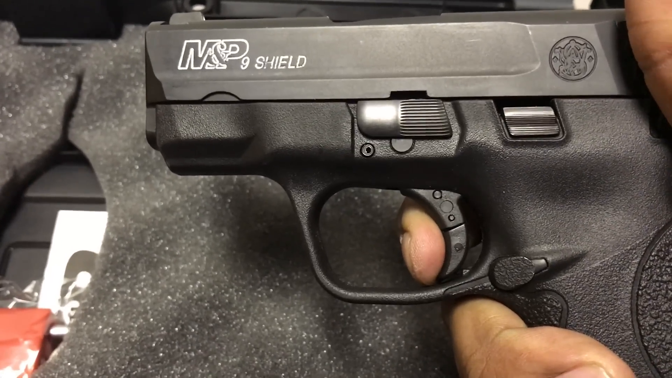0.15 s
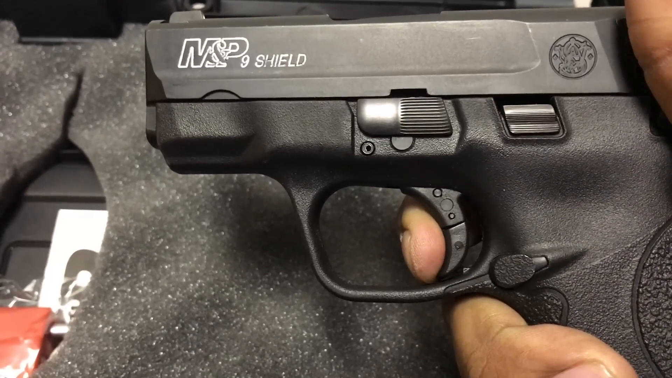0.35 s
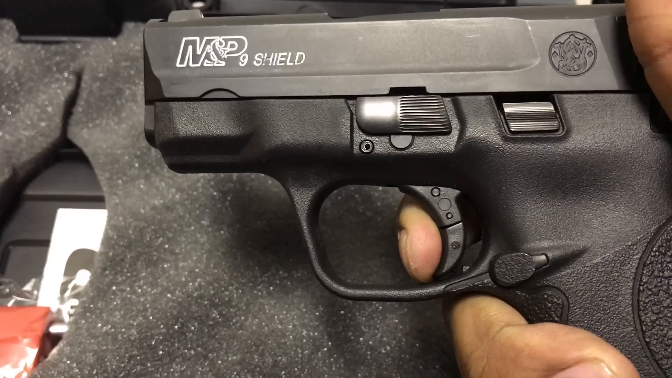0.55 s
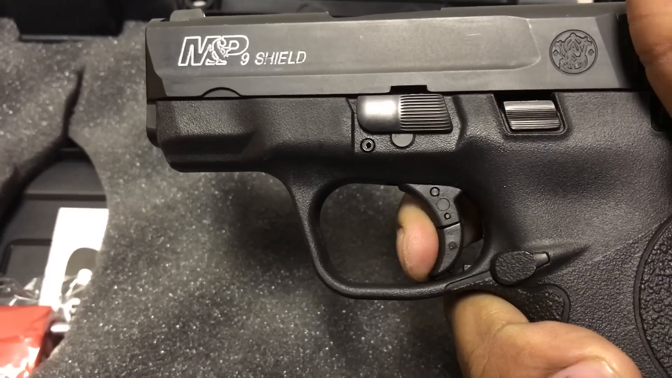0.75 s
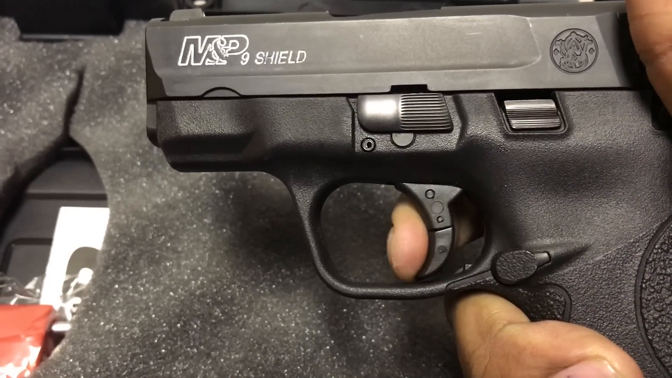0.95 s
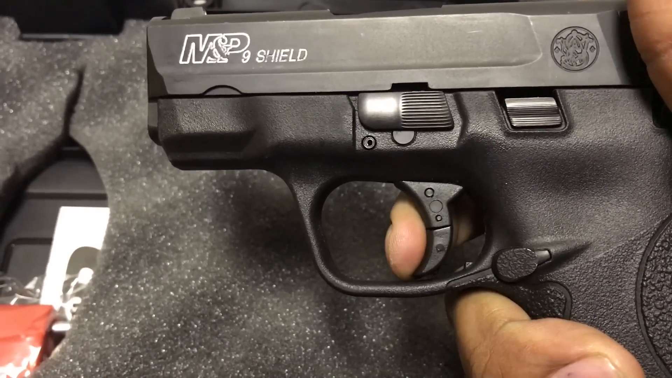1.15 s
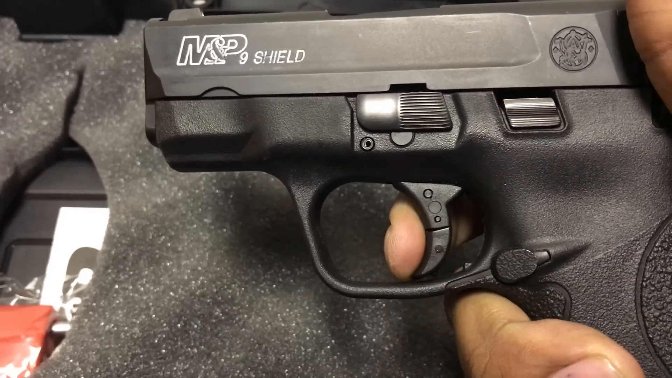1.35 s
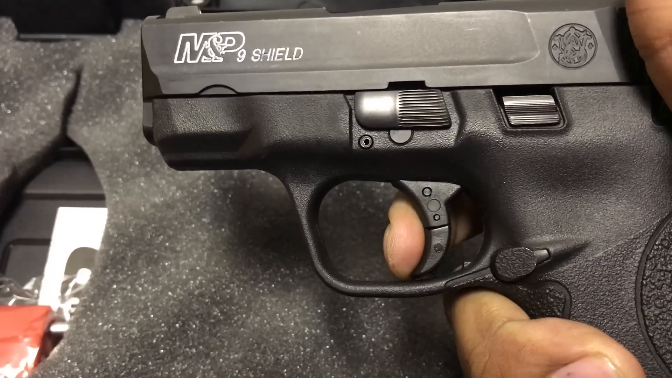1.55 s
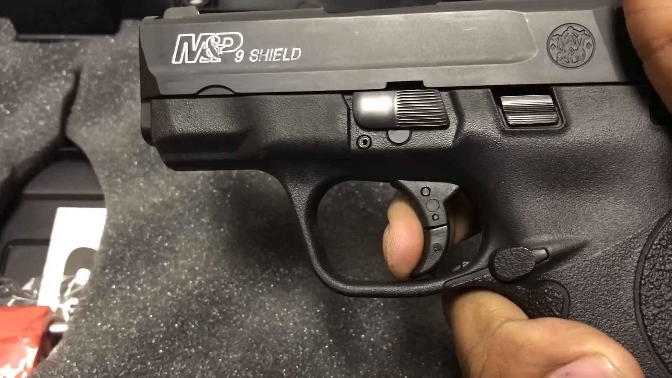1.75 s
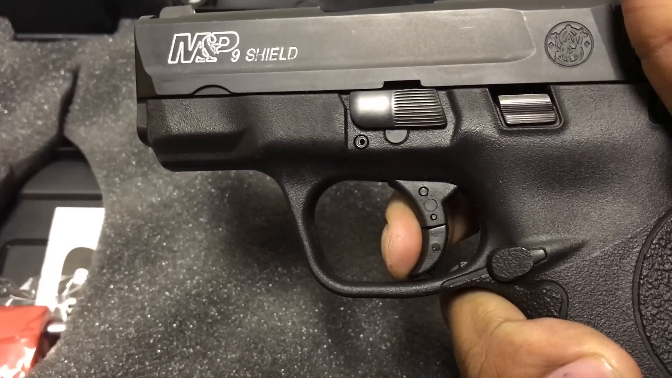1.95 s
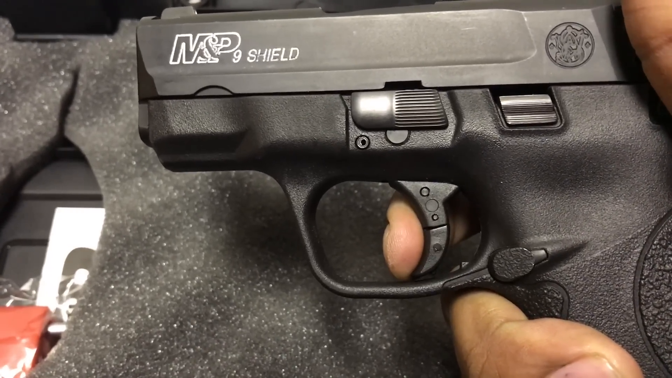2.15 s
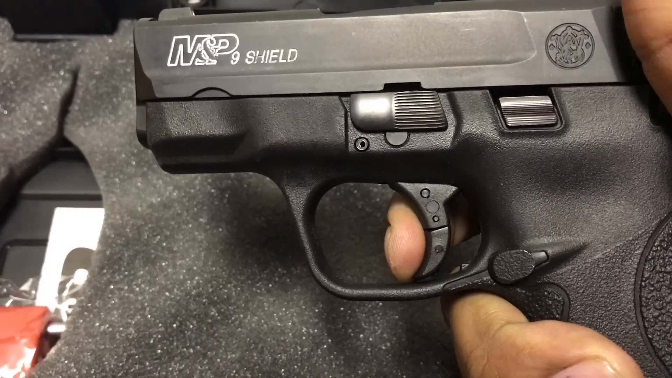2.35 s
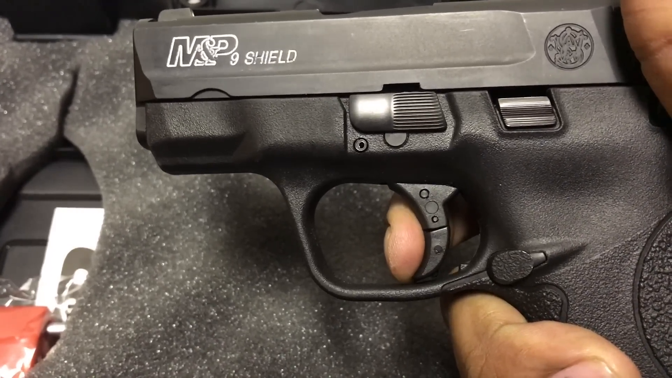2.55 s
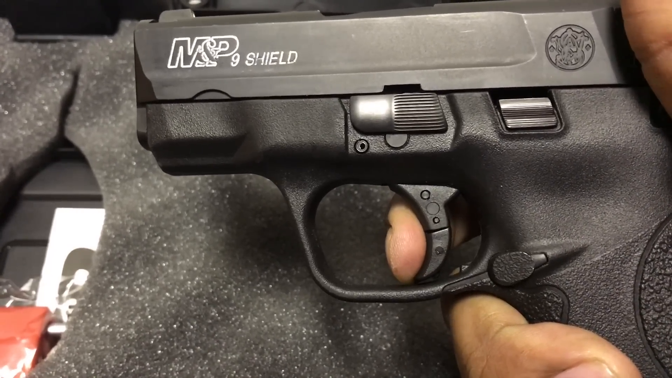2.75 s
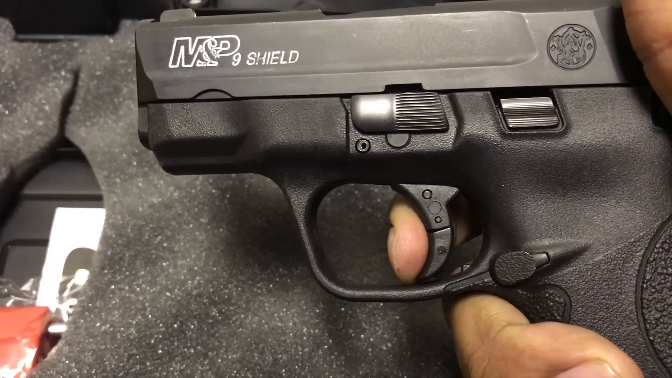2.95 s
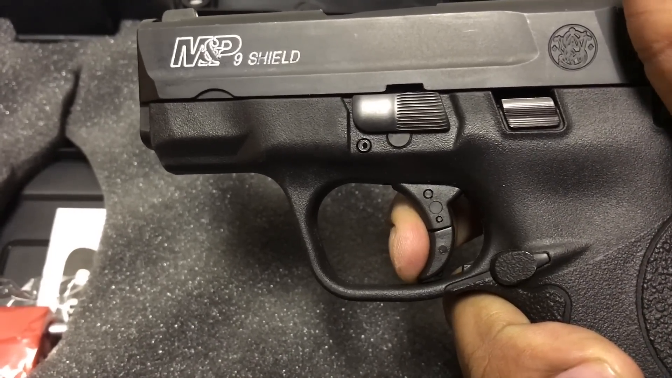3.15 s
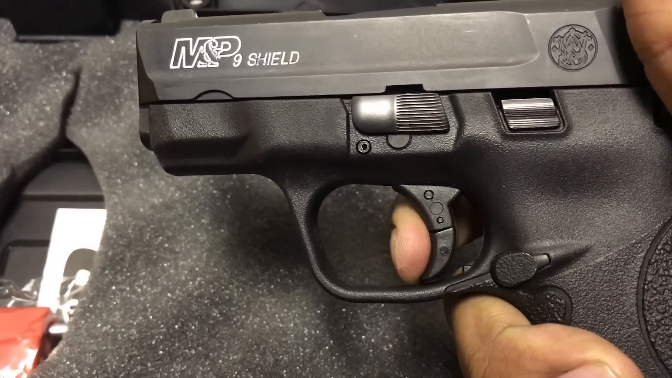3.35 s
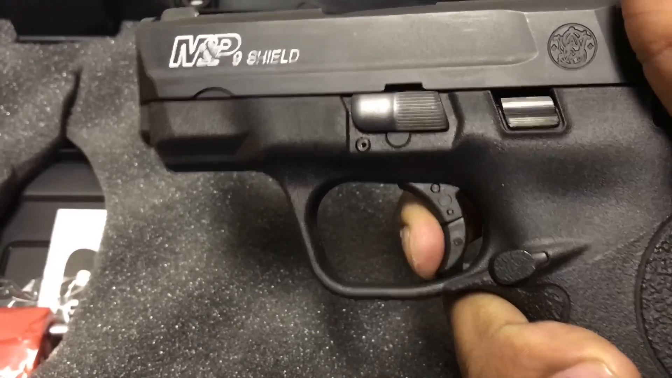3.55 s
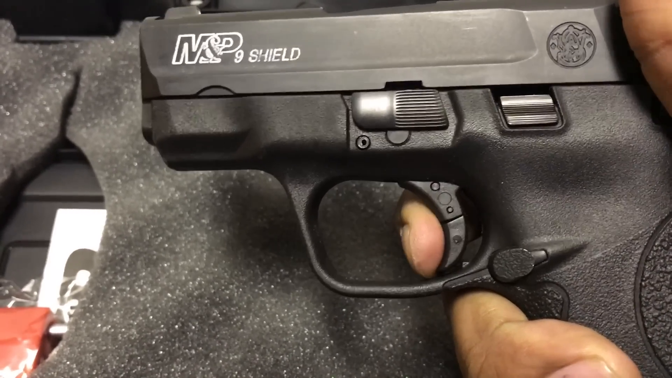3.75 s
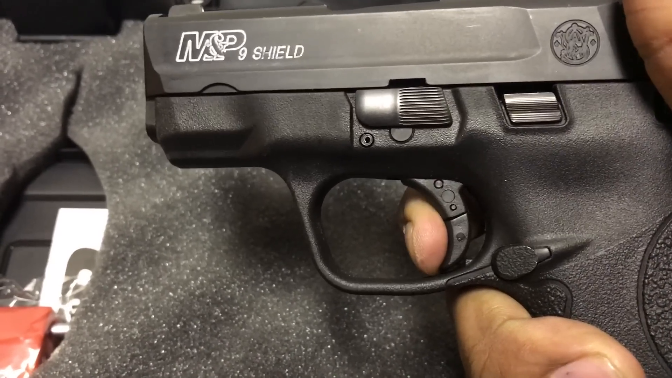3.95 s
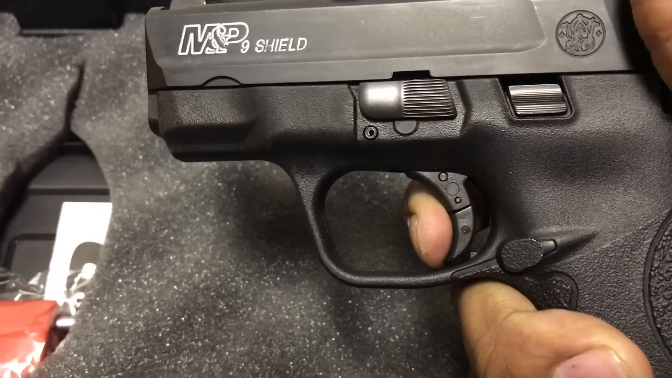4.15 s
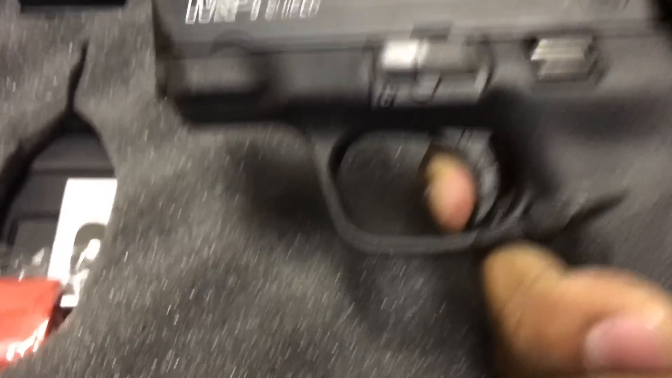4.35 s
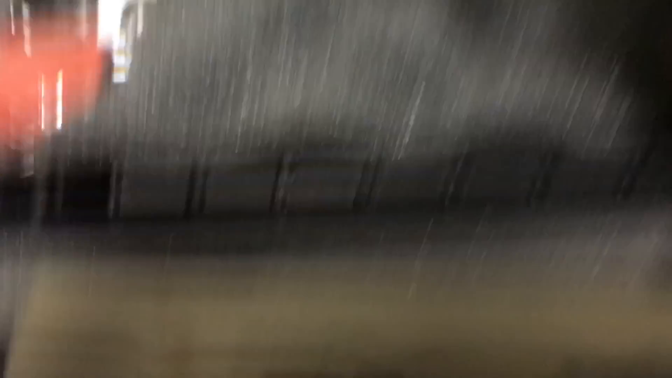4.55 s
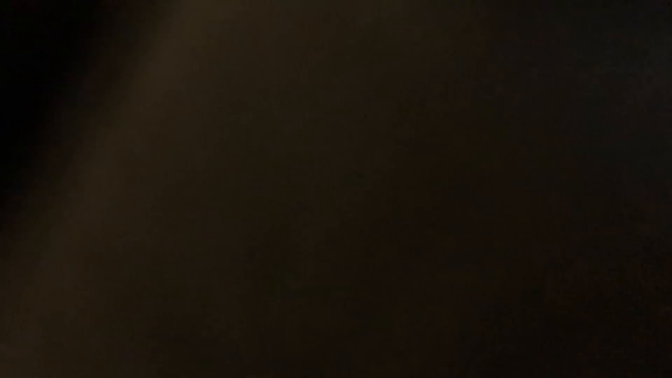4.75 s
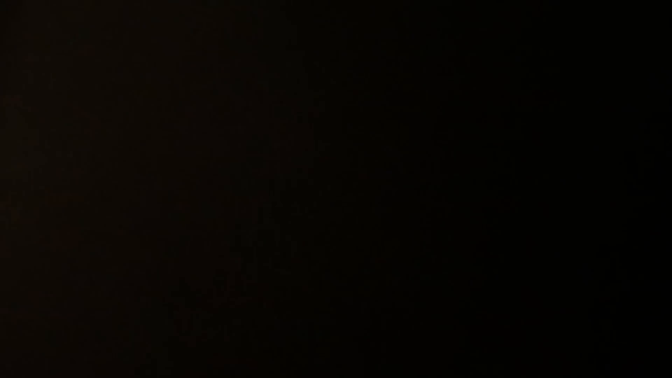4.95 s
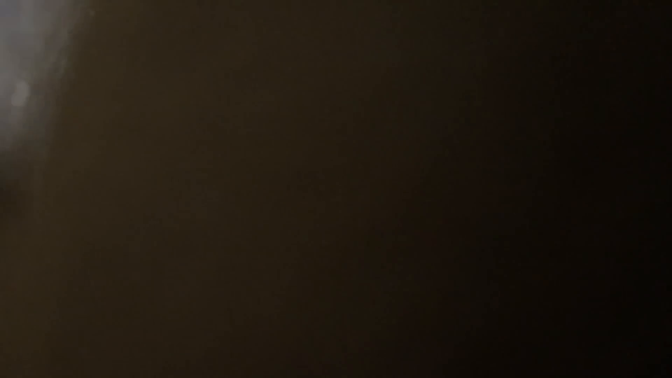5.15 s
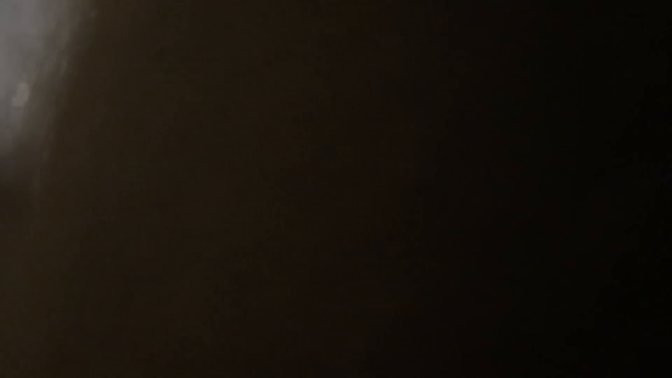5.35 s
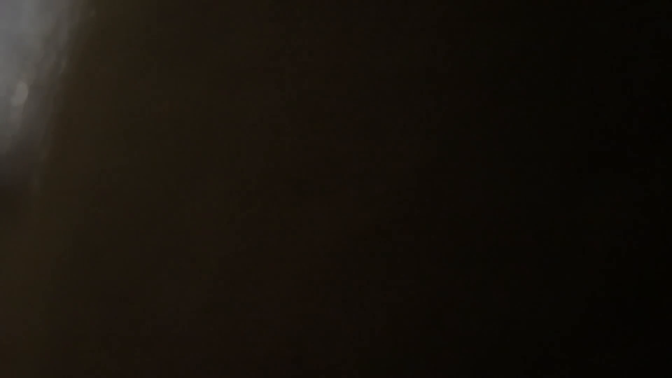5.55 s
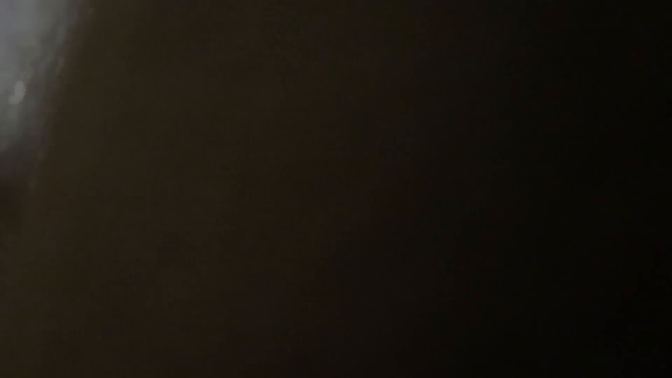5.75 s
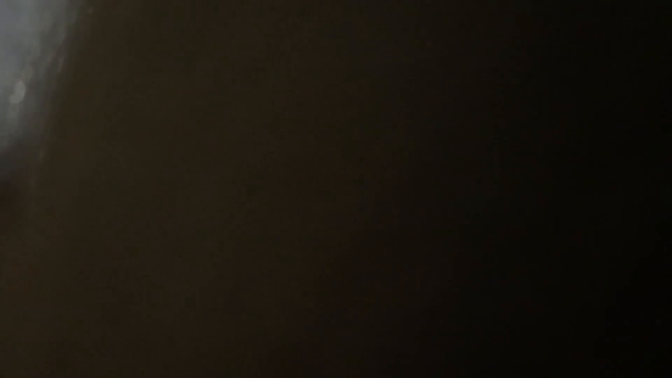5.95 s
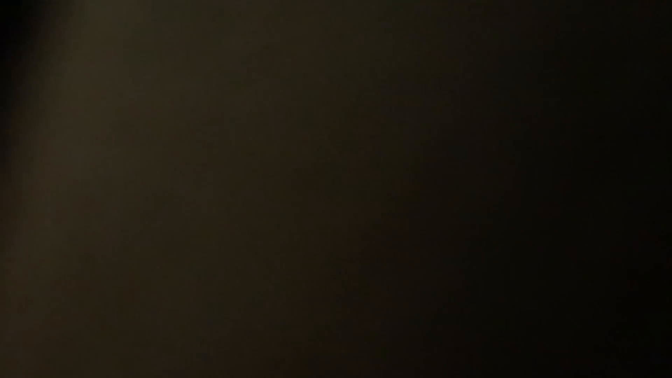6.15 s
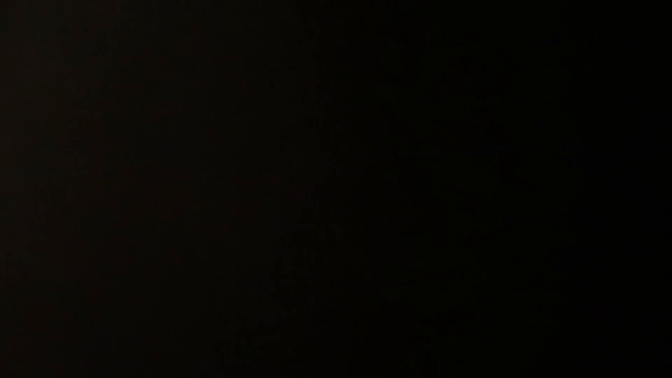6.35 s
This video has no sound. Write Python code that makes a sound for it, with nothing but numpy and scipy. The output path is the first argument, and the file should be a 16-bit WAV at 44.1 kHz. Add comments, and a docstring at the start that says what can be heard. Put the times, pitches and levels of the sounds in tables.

```python
"""A small room, a pistol dry-fired close to a phone. The trigger creeps, breaks with a click as sear and
striker knock the frame, and later snaps forward on its spring. The phone is set down with bumps and
rubbing; the steel slide is racked, scraping its rails and hitting its stops; the phone is touched again.
Mains hum and hiss lie below. The phone limits the peaks and gates its treble between loud sounds."""
import sys
import numpy as np
from scipy import signal
from scipy.fft import rfft, irfft, next_fast_len
from scipy.io import wavfile
from scipy.ndimage import uniform_filter1d, minimum_filter1d, map_coordinates

SR = 44100
rng = np.random.default_rng(int(sys.argv[2]) if len(sys.argv) > 2 else 0)


def inscribe(sig):
    """Save sig as 16-bit PCM at rate SR to the path in sys.argv[1].

    A 1-D sig is mono; a 2-D sig holds one channel per row.
    Samples are clipped to [-1, 1] before scaling.
    """
    pcm = np.round(np.clip(np.atleast_2d(sig).T, -1, 1) * 32767)
    wavfile.write(sys.argv[1], SR, pcm.astype(np.int16))


N = 281996
TIME_S = np.arange(N) / SR
AGE_S = np.arange(SR // 3) / SR  # since a contact

# mains hum: f/Hz, level/dB
HUM_TONES = [(120, -58.8), (240, -73.5)]
# hiss: f/Hz, density/dB
HISS_SPECTRUM = [(15, -37), (28, -13), (50, -4.5), (90, -11), (170, -14), (300, -17.5), (450, -21.5),
                 (840, -22.5), (2000, -27), (6000, -29.5), (13000, -29), (16000, -27)]
# background dips: t/s, level/dB
DIPS = [(3.665, -13.5), (5.15, -6)]
# room decay: f/Hz, t60/s
ROOM_DECAY = [(200, 0.17), (1500, 0.24), (4000, 0.25), (9000, 0.13), (15000, 0.1)]

# bumps on the phone's case: t/s, thud level/dB, tick level/dB, tick cutoff/Hz
BUMPS = [(4.8138, -18.5, -12, 14000), (4.837, 13.5, 7.5, 14300), (4.8442, 9.5, -2.5, 14000),
         (4.8861, 7.5, -2.5, 5460), (5.0522, -26, -11, 7000), (5.082, -9.5, -19, 6000),
         (5.108, 14.5, 9.5, 6000), (5.1106, 14, 19.5, 6000), (5.135, 0.5, -24, 6000),
         (6.347, -24, -22, 7000), (6.372, -9.5, -25, 5100)]
# thud of the case: f/Hz, density/dB
THUD_SPECTRUM = [(18, -21), (30, -22), (65, -3), (177, -4.5), (244, -1.5), (320, -4), (405, 1), (480, -8.5),
                 (570, 0.5), (730, -13.5), (1000, -13), (1700, -18), (2100, -35), (4300, -30), (8000, -45)]
# tick of the case: f/Hz, density/dB
TICK_SPECTRUM = [(500, -3), (1500, -5.5), (3000, -3.5), (6300, -0.5), (8500, -2), (11000, -7),
                 (16000, -3.5)]
# hand and cloth strokes on the case: t/s, length/s, scuff level/dB, cloth level/dB
STROKES = [(4.835, 0.071, -36.5, -65), (4.937, 0.052, -26, -50), (5.027, 0.088, -40, -53),
           (5.113, 0.028, -22.5, -67), (5.186, 0.039, -58, -76.5), (5.455, 0.025, -57.5, -71.5),
           (5.59, 0.19, -56, -54), (6.356, .04, -47.5, -52.5)]
# low scuff: f/Hz, density/dB
SCUFF_SPECTRUM = [(25, -39.5), (80, -21), (160, -8), (243, 1.5), (329, -11), (400, -4), (500, -9),
                  (680, -15), (1020, -18.5), (2150, -39), (4600, -41.5), (16000, -67)]
# cloth hiss: f/Hz, density/dB
CLOTH_SPECTRUM = [(60, -6.5), (200, -0.5), (450, -6), (1500, 0.5), (3200, -1.5), (5800, -3), (8500, -10.5),
                  (11000, -17.5), (16000, -13)]
# fingers on the phone: f/Hz, density/dB
FINGER_SPECTRUM = [(35, -45), (60, -29.5), (210, -6.5), (468, -11), (615, 0), (1160, -24), (1760, -24.5),
                   (2010, -32), (4900, -28.5), (14000, -58)]
# jolts from hard stops: t/s, level/dB
JOLTS = [(3.654, -21), (5.112, -15), (5.692, -31.5), (5.71, -43.5), (5.923, -35.5), (5.978, -30)]
# skin on the pistol's grip: f/Hz, density/dB
GRIP_SPECTRUM = [(30, -17), (70, -2.5), (210, -2), (290, -12.5), (400, -6.5), (850, -26), (1750, -19.5),
                 (3300, -26), (5000, -25), (5550, -17), (6300, -35), (9000, -24), (11000, -42)]

# slide hitting its stops: t/s, level/dB
SLIDE_HITS = [(5.6359, -19), (5.667, -18.5), (5.676, -9), (5.6825, -7), (5.6861, -3.5), (5.6922, -5),
              (5.7079, -6), (5.717, -9.5), (5.757, -15.5), (5.764, -18.5), (5.841, -27.5), (5.851, -22.5),
              (5.887, -28.5), (5.896, -17), (5.909, -7), (5.9129, -8), (5.927, -3.5), (5.933, -8),
              (5.95, -17), (5.97, -13.5), (5.975, -7)]
# slide travel, back then forward: t/s, length/s, level/dB
SLIDE_TRAVEL = [(5.683, .035, -25.5), (5.912, 0.019, -18.5)]
# slide on its rails: f/Hz, density/dB
RAIL_SPECTRUM = [(88, -46.5), (150, -26), (504, -30), (805, -24.5), (960, -28), (1170, -10), (1500, -15),
                 (2060, -5.5), (3220, -4.5), (3620, 1), (7040, -11.5), (8230, -9.5), (10200, -19.5),
                 (11000, -13), (14000, -16.5), (15200, -13), (16000, -21)]
# slide's steel: f/Hz, level/dB, t60/s
STEEL_MODES = [(2094, -6, .1), (2436, -3, .12), (2586, -3, .12), (2738, -1, .13), (2892, -1, .13),
               (3533, -2, .15), (3671, 1, .15), (3859, -2, .14), (4246, -4, .12), (4421, -1, .14),
               (5110, -1, .14), (5389, -4, .13), (7284, -15, .2), (8240, -9, .08), (10700, -6, .12),
               (11092, 1, .19)]

# scrapes of the moving trigger: t/s, length/s, level/dB
SEAR_SCRAPES = [(0.585, 0.063, -67.5), (.75, .1, -69.5), (2.788, .01, -66), (2.92, .01, -69),
                (3.464, .03, -69)]
# scraping sear: f/Hz, density/dB
SEAR_SPECTRUM = [(500, -25), (1000, -11), (1400, 2), (2300, -20), (3600, -6), (6000, -22), (16000, -33)]
# spring singing under the finger: t/s, length/s, level/dB
SPRING_TONES = [(2.176, .04, -59), (3.34, .015, -59)]
# trigger bar's slip, then snap: t/s, level/dB, contact gap/s, loss per contact/dB
BAR_CHATTERS = [(3.6301, -18, .005, 7), (3.6504, -6, .0026, 0.47)]
# chattering bar: f/Hz, density/dB
CHATTER_SPECTRUM = [(30, -16), (110, -6.5), (220, -10), (700, -17), (1250, -3.5), (1900, -3), (2350, -12.5),
                    (3200, 0), (4400, -6), (5300, -3), (7800, -9), (10700, 1), (13500, -8.5), (15300, -3.5)]
# bar and spring: f/Hz, level/dB, t60/s
BAR_MODES = [(1242, -3, .07), (1647, -3, .07), (3076, -3, .06), (5363, -2, .06), (6469, -3, .06),
             (10957, 0, .09), (14480, -2, .07), (15133, 0, .06)]
# take-up, break, striker's fall, loose parts: t/s, level/dB, tilt/(dB/octave)
CLICKS = [(0.591, -38.5, -5.5), (0.984, -35.5, -6), (1.002, -40, -4), (1.0292, -11, 1.5),
          (1.071, -30, -6.5), (1.1765, -43.5, 2), (1.199, -24.5, 4), (1.2006, -1, 2), (1.967, -44, 1),
          (3.483, -41, -6.5), (4.386, -37.5, -8), (5.574, -29.5, -7), (6.183, -42.5, -4)]
# hand-damped frame: f/Hz, level/dB, t60/s
FRAME_MODES = [(1303, -5.5, 0.024), (1600, -1, 0.011), (1970, -6.5, .011), (2853, -10.5, .011),
               (3161, -8, 0.012), (3550, -10.5, .013), (4120, -13.5, 0.016), (4887, -14.5, .007),
               (10120, -14.5, 0.0038), (13000, -17, .009), (14000, -18, .007), (15100, -14.5, 0.0057)]
# striker, rung by hard blows: f/Hz, level/dB, t60/s
STRIKER_MODES = [(5630, -3, .01), (6290, -9, 0.015), (7100, -16.5, .011), (7650, -14.5, 0.0073),
                 (8600, -6.5, .006)]
# click radiated into the room: f/Hz, density/dB
CLICK_SPECTRUM = [(300, -28.5), (900, -14), (1550, 6), (2400, -6), (3500, -1.5), (6000, -4), (9500, -9.5),
                  (11500, -13), (14500, -16.5), (16000, -18)]


def amp(db):
    """Decibels to gain."""
    return 10 ** (np.asarray(db) / 20)


def unit_rms(x):
    """x at rms 1."""
    return x / np.sqrt(np.mean(x ** 2) + 1e-20)


def log_interp(points, hz):
    """Interpolate (f/Hz, value) points on a log axis."""
    points_hz, values = np.transpose(points)
    return np.interp(np.log(hz + 1), np.log(points_hz + 1), values)


def add(track, t_s, sound):
    """Mix a sound into the track at t_s."""
    part = track[round(t_s * SR):][:len(sound)]
    part += sound[:len(part)]


def coloured(x, spectrum):
    """Minimum-phase filter; keeps the power of white noise."""
    size = 8192
    gain = unit_rms(amp(log_interp(spectrum, np.fft.rfftfreq(size, 1 / SR))))
    cepstrum = irfft(np.log(np.maximum(gain, 1e-6)))
    cepstrum[1:size // 2] *= 2
    cepstrum[size // 2 + 1:] = 0
    return signal.fftconvolve(x, irfft(np.exp(rfft(cepstrum))))[:N]


def lowpass(x, hz, order):
    """Zero-phase low-pass."""
    size = next_fast_len(N + 8192)
    loss = np.sqrt(1 + (np.fft.rfftfreq(size, 1 / SR) / hz) ** (2 * order))
    return irfft(rfft(x, size) / loss, size)[:N]


def fade(t60_s):
    """Exponential decay."""
    return np.exp(-np.log(1000) * AGE_S / t60_s)


def swell(t_s, length_s, rise_s, fall_s):
    """Envelope: grows until t_s, holds, decays."""
    before_s = np.maximum(t_s - TIME_S, 0)
    after_s = np.maximum(TIME_S - t_s - length_s, 0)
    return np.exp(-before_s / rise_s - after_s / fall_s)


def burst(t60_s):
    """Decaying noise of one contact."""
    return rng.standard_normal(len(AGE_S)) * fade(t60_s)


def push(length_s):
    """Brief rattling force with a flat spectrum."""
    window = np.exp(-(AGE_S[:1024] / length_s) ** 4)
    force = rng.standard_normal(len(window)) * window
    for _ in range(12):
        phase = np.angle(rfft(force))
        force = irfft(np.exp(1j * phase)) * window
    return force


def ring(modes, scatter_db):
    """Damped modes at random strengths and phases."""
    return sum(amp(db + scatter_db * rng.standard_normal()) * fade(t60_s)
               * np.sin(2 * np.pi * (hz * AGE_S + rng.random())) for hz, db, t60_s in modes)


def knock(modes, tilt_db_oct):
    """A part's impulse response, tilted about the frame's lowest mode."""
    pivot_hz = FRAME_MODES[0][0]
    return sum((-1) ** k * amp(db + tilt_db_oct * np.log2(hz / pivot_hz)) * fade(t60_s)
               * np.sin(2 * np.pi * hz * AGE_S) for k, (hz, db, t60_s) in enumerate(modes))


def friction(envelope, spectrum, rough_db, grain_hz):
    """Stick-slip noise of two surfaces."""
    grains = rng.standard_normal(int(N * grain_hz / SR) + 4)
    roughness = amp(rough_db * map_coordinates(grains, [TIME_S * grain_hz / SR]))
    return coloured(unit_rms(rng.standard_normal(N) * roughness) * envelope, spectrum)


def room(x, onset_s=.0013):
    """Small-room reverberation; each band decays at its own rate."""
    hz, t_s, bands = signal.stft(rng.standard_normal(SR // 2), SR, nperseg=256)
    decay = np.exp(-np.log(1000) * t_s / log_interp(ROOM_DECAY, hz)[:, None])
    tail = signal.istft(bands * decay, SR, nperseg=256)[1]
    tail *= 1 - np.exp(-np.arange(len(tail)) / SR / onset_s)
    return signal.fftconvolve(x, tail / np.linalg.norm(tail))[:N]


def background(hiss_db=-61, sink_s=.025, hold_s=.1, recover_s=.059):
    """Mains hum and hiss; both dip briefly after the heaviest jolts."""
    hum = sum(amp(db) * np.sqrt(2) * np.sin(2 * np.pi * (hz * TIME_S + rng.random()))
              for hz, db in HUM_TONES)
    hiss = amp(hiss_db) * coloured(rng.standard_normal(N), HISS_SPECTRUM)
    dip_db = sum(db * swell(t_s + sink_s, hold_s, sink_s, recover_s) for t_s, db in DIPS)
    return (hum + hiss) * amp(dip_db)


def case_bumps(thud_s=.00443, tick_s=.0008):
    """Bumps reach the microphone through the phone's case, with no room."""
    thuds, ticks = np.zeros(N), np.zeros(N)
    for t_s, thud_db, tick_db, cutoff_hz in BUMPS:
        add(thuds, t_s, amp(thud_db) * push(thud_s))
        softness = signal.butter(2, cutoff_hz, fs=SR)
        add(ticks, t_s, amp(tick_db) * signal.lfilter(*softness, push(tick_s)))
    return coloured(thuds, THUD_SPECTRUM) + coloured(ticks, TICK_SPECTRUM)


def case_rubbing(moved_s=4.38, rustle_db=-67.5, grab_s=6.374, grab_db=-26):
    """Hand and cloth rub the phone once it is moved; fingers grab it again."""
    scuff = np.zeros(N)
    cloth = amp(rustle_db) * (TIME_S > moved_s)
    for t_s, length_s, scuff_db, cloth_db in STROKES:
        stroke = swell(t_s, length_s, rise_s=.008, fall_s=.013)
        scuff += amp(scuff_db) * stroke
        cloth += amp(cloth_db) * stroke
    grab = amp(grab_db) * swell(grab_s, length_s=1, rise_s=.0018, fall_s=.013)
    return (friction(scuff, SCUFF_SPECTRUM, rough_db=2, grain_hz=201.3)
            + friction(grab, FINGER_SPECTRUM, rough_db=6, grain_hz=298)
            + friction(cloth, CLOTH_SPECTRUM, rough_db=5.5, grain_hz=602))


def jolts(hz=62, t60_s=.071):
    """Low swing of hands, gun and phone after hard stops."""
    swings = np.zeros(N)
    for t_s, db in JOLTS:
        add(swings, t_s, amp(db) * np.sin(2 * np.pi * hz * AGE_S) * fade(t60_s))
    return swings


def grip_creak(level_db=-45):
    """Skin slips once on the pistol's grip."""
    slip = amp(level_db) * swell(t_s=.178, length_s=.029, rise_s=.001, fall_s=.024)
    return friction(slip, GRIP_SPECTRUM, rough_db=4, grain_hz=300)


def slide(crack_db=4, attack_s=.00069, steel_db=-22, steel_exponent=2.65, room_db=-20):
    """The slide scrapes its rails and cracks on its stops; hard hits are brighter and ring the steel."""
    blows, steel = np.zeros(N), np.zeros(N)
    for t_s, db in SLIDE_HITS:
        crack = amp(db + crack_db) * burst(t60_s=.016) * (1 - np.exp(-AGE_S / attack_s))
        cutoff_hz = 3500 * (1 + 3 * amp(db))  # a light touch lasts longer: less treble
        pole = np.exp(-2 * np.pi * cutoff_hz / SR)
        add(blows, t_s, signal.lfilter([1 - pole], [1, -pole], crack))
        add(steel, t_s, amp(steel_exponent * db + steel_db) * ring(STEEL_MODES, scatter_db=3))
    pressure = sum(amp(db) * swell(t_s, length_s, rise_s=.01, fall_s=.011)
                   for t_s, length_s, db in SLIDE_TRAVEL)
    scrape = friction(pressure, RAIL_SPECTRUM, rough_db=2, grain_hz=600)
    clatter = coloured(blows, RAIL_SPECTRUM) + scrape
    return clatter + steel + amp(room_db) * room(clatter)


def trigger_creep(spring_hz=11300, rise_s=.004, fall_s=.012):
    """Slow trigger travel: the sear scrapes, the spring sings."""
    pressure = sum(amp(db) * swell(t_s, length_s, rise_s, fall_s) for t_s, length_s, db in SEAR_SCRAPES)
    singing = sum(amp(db) * swell(t_s, length_s, rise_s, rise_s) for t_s, length_s, db in SPRING_TONES)
    scrape = friction(pressure, SEAR_SPECTRUM, rough_db=5, grain_hz=250)
    return scrape + singing * np.sin(2 * np.pi * spring_hz * TIME_S)


def trigger_reset(contacts=7, ring_db=-26, tone_hz=3077, tone_db=-27.5, room_db=-15.5):
    """The sprung trigger bar chatters forward and rings; a brief tone swells into the snap and fades."""
    blows, bar = np.zeros(N), np.zeros(N)
    for start_s, first_db, gap_s, loss_db in BAR_CHATTERS:
        for k in range(contacts):
            t_s, db = start_s + k * gap_s, first_db - k * loss_db
            add(blows, t_s, amp(db) * burst(t60_s=.004 + .023 * amp(db)))
            add(bar, t_s, amp(db + ring_db) * ring(BAR_MODES, scatter_db=2.5))
    snap_s = BAR_CHATTERS[-1][0]
    tone_envelope = swell(snap_s, length_s=0, rise_s=.0064, fall_s=.0064)
    tone = amp(tone_db) * tone_envelope * np.sin(2 * np.pi * tone_hz * TIME_S)
    direct = coloured(blows, CHATTER_SPECTRUM) + bar + tone
    return direct + amp(room_db) * room(direct)


def trigger_clicks(contact_s=.0024, ring_db=-5, low_cut_hz=700, room_db=-12):
    """Sear and striker knock the frame; the clicks carry no bass."""
    knocks, blows = np.zeros(N), np.zeros(N)
    for t_s, db, tilt_db_oct in CLICKS:
        force = amp(db) * push(contact_s)
        response = knock(FRAME_MODES, tilt_db_oct) + amp(db) * knock(STRIKER_MODES, tilt_db_oct)
        add(knocks, t_s, amp(ring_db) * signal.fftconvolve(force, response))
        add(blows, t_s, amp(tilt_db_oct) * force)  # brighter clicks drive the room harder
    low_cut = signal.butter(2, low_cut_hz, "high", fs=SR, output="sos")
    return signal.sosfilt(low_cut, knocks) + amp(room_db) * room(coloured(blows, CLICK_SPECTRUM))


def scene():
    """Pistol, phone handling and background, in mono."""
    pistol = grip_creak() + trigger_creep() + trigger_clicks() + trigger_reset() + slide()
    handling = jolts() + case_bumps() + case_rubbing()
    return (pistol + handling + background())[None]


def treble_gate(x, threshold_db=-17, closed_db=-10, split_hz=300, hold_s=.425, ahead_s=.012):
    """Treble is turned down, except from just before a loud sound until the hold ends."""
    hold, ahead = int(hold_s * SR), int(ahead_s * SR)
    quiet = uniform_filter1d(x ** 2, size=176) < amp(threshold_db) ** 2
    closed = minimum_filter1d(quiet * 1., hold, origin=(hold - 1) // 2 - ahead, mode="nearest")
    bass = lowpass(x, split_hz, order=1)
    return bass + (x - bass) * amp(closed_db * uniform_filter1d(closed, size=64))


def limiter(x, ceiling=.86):
    """Fast gain reduction holds peaks under the ceiling."""
    gain = np.minimum(1, ceiling / (np.abs(x) + 1e-9))
    return x * uniform_filter1d(minimum_filter1d(gain, size=21), size=21)


def record(dry):
    """The phone gates, limits and cuts the top of the band."""
    return lowpass(limiter(treble_gate(dry[0])), hz=15950, order=90)[None]


dry = scene()
out = record(dry)
inscribe(out)
```